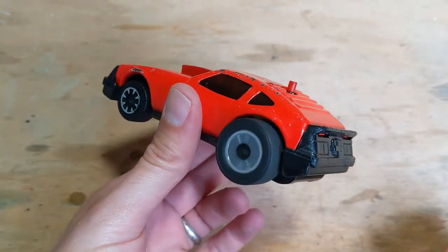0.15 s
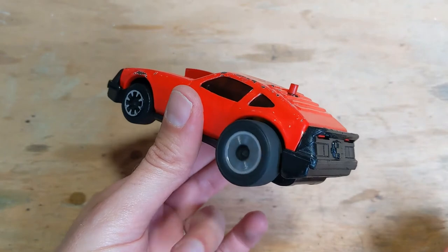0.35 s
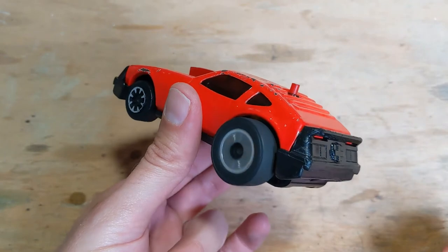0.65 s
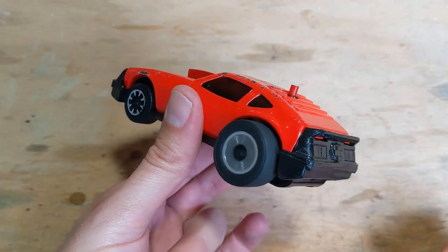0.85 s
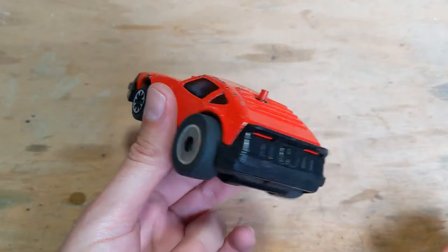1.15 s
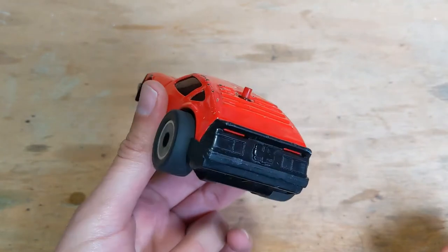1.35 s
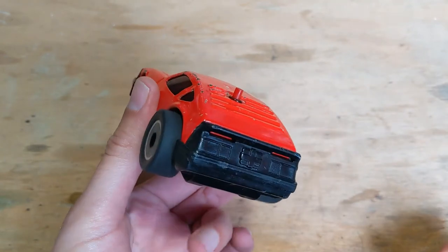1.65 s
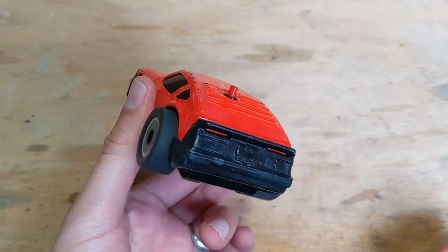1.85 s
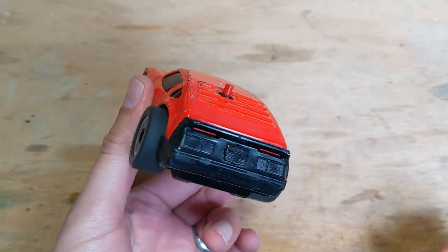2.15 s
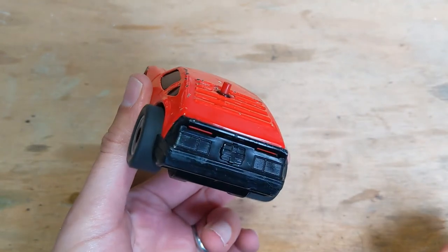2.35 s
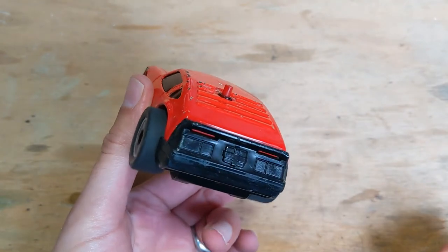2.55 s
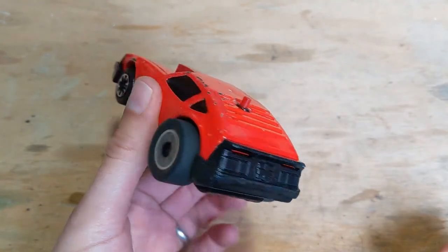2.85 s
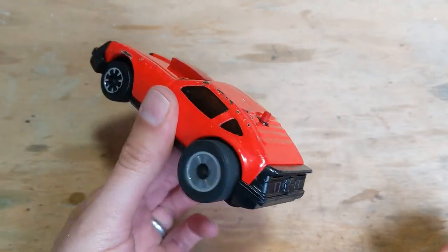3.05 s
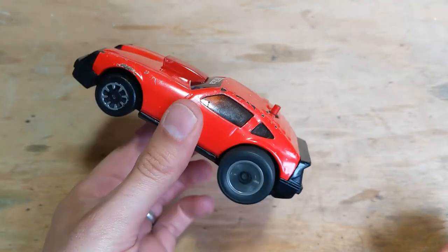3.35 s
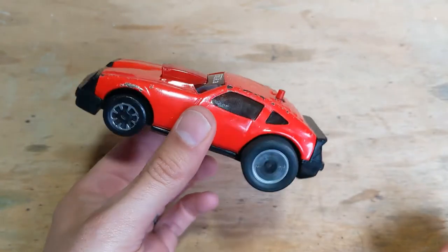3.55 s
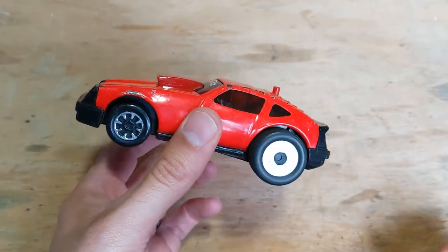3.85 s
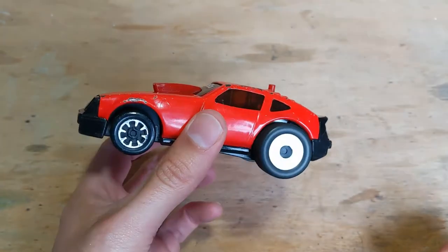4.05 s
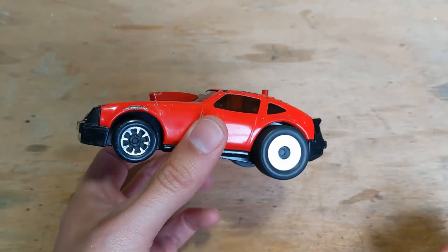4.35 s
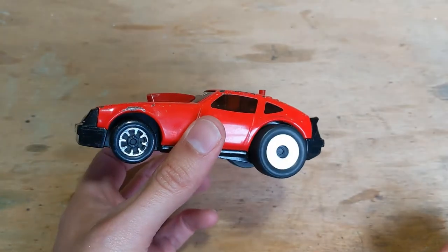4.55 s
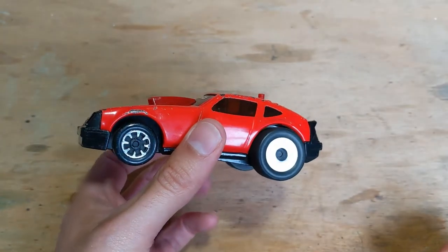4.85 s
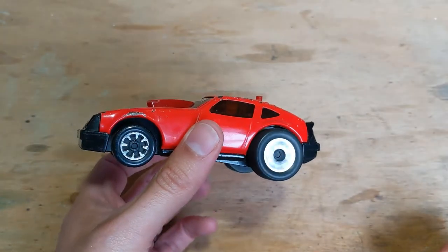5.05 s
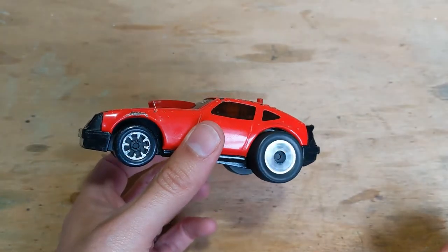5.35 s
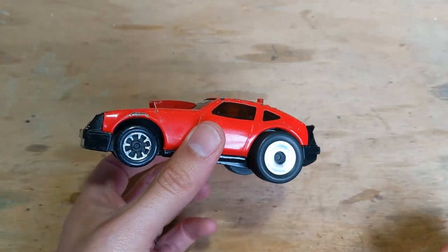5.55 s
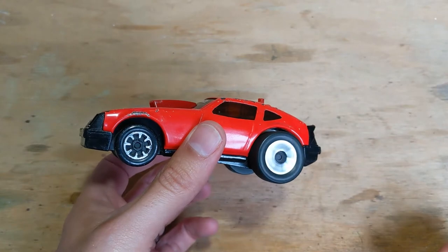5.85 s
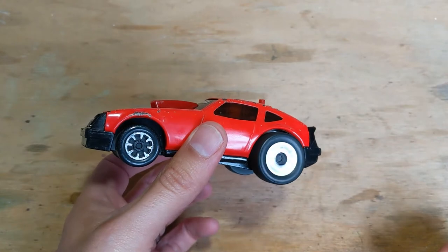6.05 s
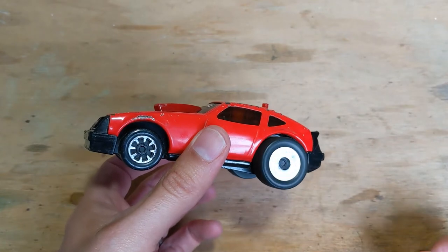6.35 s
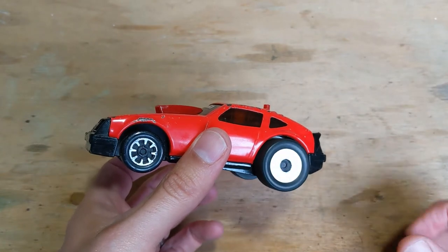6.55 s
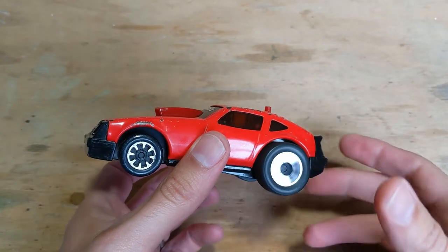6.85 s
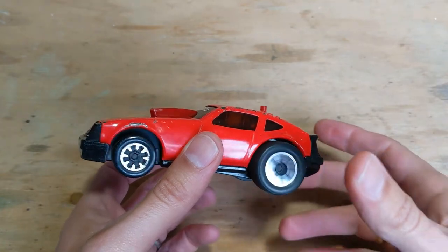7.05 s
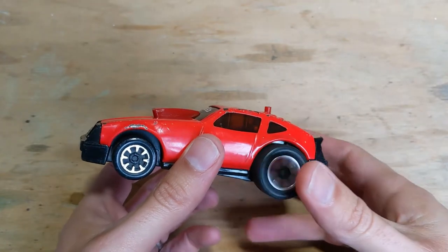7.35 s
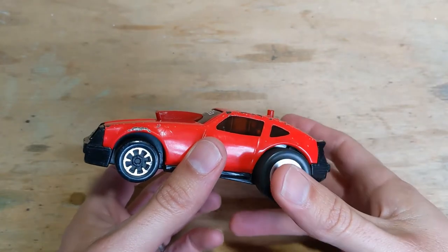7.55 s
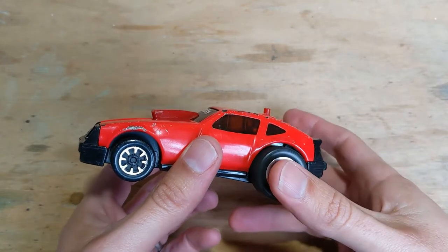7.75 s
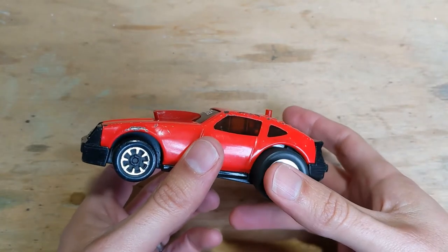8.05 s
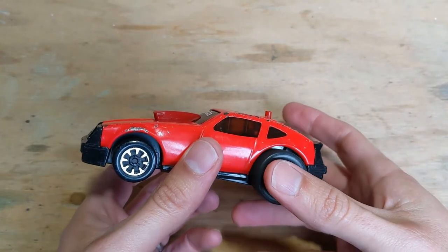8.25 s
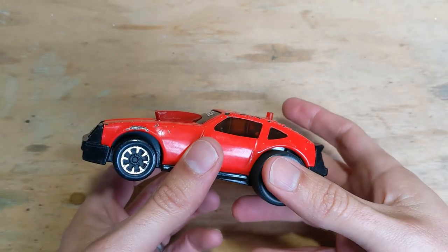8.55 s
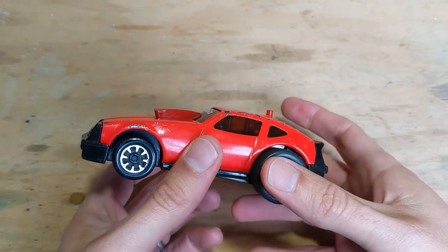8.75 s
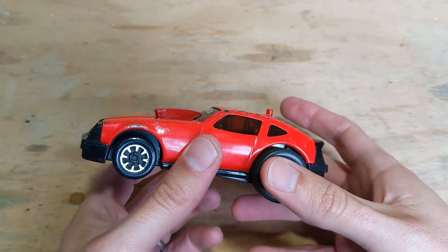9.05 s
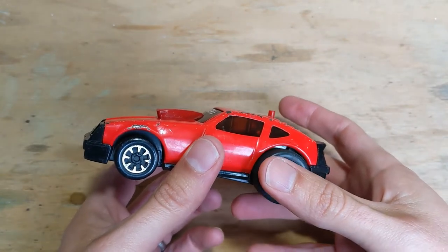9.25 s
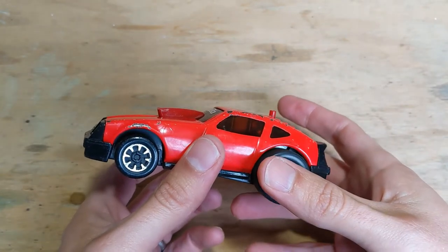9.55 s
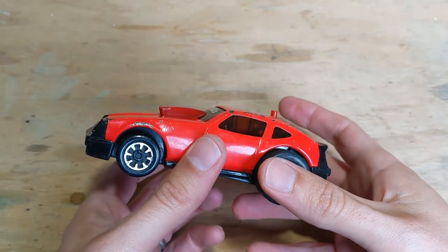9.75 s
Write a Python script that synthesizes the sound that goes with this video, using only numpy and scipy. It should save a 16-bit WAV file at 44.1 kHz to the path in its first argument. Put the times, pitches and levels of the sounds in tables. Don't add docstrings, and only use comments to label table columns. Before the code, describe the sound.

Continuous mechanical whir from a friction-motor toy, very near, in a quiet room with a short reflection off a nearby surface. A buzzy, slightly beating whine with overtones rides on dense plastic rattle, gradually falling and softening for about eight seconds, its colour shifting as the hand turns the car. Then braking makes the fall steeper, leaving slow granular gear chatter almost stopped at the end, over a faint low room hum.

```python
import sys
import numpy as np
from scipy import signal
from scipy.fft import rfft, irfft, next_fast_len
from scipy.io import wavfile
from scipy.ndimage import uniform_filter1d

SR = 44100
rng = np.random.default_rng(int(sys.argv[2]) if len(sys.argv) > 2 else 0)


def generate_wav(sig):
    pcm = np.round(np.clip(np.atleast_2d(sig).T, -1, 1) * 32767).astype(np.int16)
    wavfile.write(sys.argv[1], SR, pcm)


def voltage_ratio(decibels):
    exponent = np.asarray(decibels, float) / 20
    return 10 ** exponent


N = 436149

TEETH = 27
CRUISE = 70
# (t/s, level/dB)
LOAD = [(0, 0), (.5, -2.5), (1, -1.5), (1.3, -2), (1.5, 1.5), (1.75, -1.6), (2.2, -1.5), (2.8, 0.6),
        (3.4, 1.3), (4, 1.6), (4.6, -1.2), (5.4, 1.3), (6.2, 2.5), (6.8, 1), (7.5, 0.5), (8.3, 3.9),
        (9.15, 7), (9.89, 5)]
# (t/s, half length/s, flutter depth 0-1, extra rattle level/dB)
JOLTS = [
    (1.46, 0.11, 0.94, 2.5),
    (2.7, .1, 0.4, -3),
    (5.05, 0.072, 0, 3),
    (8.3, 0.13, 0.27, .5),
]
# (t/s, half length/s, rumble level/dB, hum level/dB)
SWELLS = [(2.05, 0.23, 5, -2.5), (4.2, 0.67, 5.5, -4.5), (5.6, 0.67, 8, -3.5), (6.7, 0.9, 1, -3),
          (8.3, .4, 2, -1.5), (9.75, 0.072, 9, 6)]


def unit(x):
    return x / np.sqrt(np.mean(x ** 2) + 1e-20)


def along(points, hz):
    f, v = np.transpose(points)
    return np.interp(np.log(hz + 1), np.log(f + 1), v)


def curves(rows):
    s, *cols = np.transpose(rows)
    return [np.interp(np.arange(N) / SR, s, c) for c in cols]


def bumps(rows, column=2):
    t = np.arange(N) / SR
    return sum(row[column] * np.exp(-((t - row[0]) / row[1]) ** 2) for row in rows)


def wobble(rate):
    knots = rng.standard_normal(2000)
    return np.interp(np.arange(N) * rate / SR, np.arange(len(knots)), knots)


def filtered(x, response):
    m = next_fast_len(N + SR // 2)
    return irfft(rfft(x, m) * response(np.fft.rfftfreq(m, 1 / SR)), m)[..., :N]


def room_tone():
    # (f/Hz, level/dB per Hz)
    tone_colour = [(12, -30), (20, 0), (32, -1), (70, -7), (92, -18), (119, -20), (166, -30), (216, -19),
                   (244, -25), (275, -21), (383, -27), (480, -26), (620, -56), (1060, -120)]
    # (f/Hz, likeness 0-1)
    alike = [(30, 0.89), (70, 1), (150, 0.16), (400, 0.057)]
    rumble_db, hum_db, drift_db = -60, -60.5, 1

    def colour(hz):
        turn = np.arccos(np.clip(along(alike, hz), -1, 1)) / 2
        return voltage_ratio(along(tone_colour, hz)) * np.array([np.cos(turn), np.sin(turn)])

    out = 0
    for base_db, column, side in [(rumble_db, 2, -1), (hum_db, 3, 1)]:
        level_db = base_db + bumps(SWELLS, column=column) + drift_db * wobble(5)
        noise = rng.standard_normal((2, N))
        mid, diff = filtered(noise, lambda hz: colour(hz) / (1 + (48 / (hz + 1)) ** (6 * side)))
        out = out + voltage_ratio(level_db) * unit(np.array([mid + diff, mid - diff]))
    return out


def hums():
    # (f/Hz, level/dB)
    machines = [
        (26, -65),
        (64, -68.5),
    ]
    t = np.arange(N) / SR
    out = 0
    for (hz, db), column in zip(machines, (2, 3)):
        level_db = db + 2 + bumps(SWELLS, column=column) + 6.4 * wobble(5.6)
        out = out + voltage_ratio(level_db) * np.sin(2 * np.pi * hz * t + 1.53 * wobble(7.5))
    return out


def room(x):
    # (f/Hz, t60/s)
    walls = [(300, .3), (2000, .25), (12000, .2)]
    out, hop = np.zeros((2, N + 4 * SR)), SR // 2
    x, fade = np.pad(x, (hop, 2 * hop)), np.sqrt(np.hanning(2 * hop))
    for start in range(0, N + hop, hop):
        hz, t, z = signal.stft(rng.standard_normal((2, SR // 4)), SR, nperseg=256)
        decay = voltage_ratio(-60 * t / along(walls, hz)[:, None])
        tail = signal.istft(z * decay, SR, nperseg=256)[1]
        chunk = x[start:start + 2 * hop] * fade
        piece = signal.fftconvolve(chunk[None], tail / np.linalg.norm(tail[0]), axes=1)
        out[:, start:start + piece.shape[1]] += piece
    return out[:, hop - 200:][:, :N]


def shell(hz, pose):
    # (f/Hz, level/dB per Hz)
    body_colour = [(180, -37), (300, -12), (601, -23.5), (925, -3.5), (1040, -9.5), (1270, 1), (1420, 2),
                   (1680, -1), (2630, 1), (3200, 7), (4770, 0.5), (5620, -2), (8230, -6), (9870, -9.5),
                   (15700, -12.5)]
    # (f/Hz, width/Hz, lift with tail to the camera/dB, lift side on/dB)
    modes = [(519.6, 31, 13, 10.5), (597, 33, 9.5, 8), (830, 250, 7, 11.5), (871, 37, -26, -11.5),
             (950, 115, -3, 11.5), (1050, 89, 13.5, -28), (1227, 240, 10.5, -5), (1643, 27, 8.5, 14),
             (2064, 153, 5.5, 8.5), (2278, 97, 3.5, 10), (2590, 36, 3.5, -2), (2970, 85, 4, 5.5),
             (3216, 43, -20, 13), (4132, 94, 2, 8), (5643, 660, 6.5, 10.5), (7310, 710, 2.5, 5.5),
             (8300, 150, -9, -3.5), (9850, 1000, 9.5, 6), (12000, 1300, 8.5, 5), (14560, 1240, 12, 9)]
    lift_db = sum(lift[pose] / (1 + (2 * (hz - c) / w) ** 2) for c, w, *lift in modes)
    bounce = 1 + 0.049 * np.exp(-hz / 5000) * np.exp(-2j * np.pi * hz / 206)
    return voltage_ratio(along(body_colour, hz) + lift_db) * bounce


def part_levels(speed):
    # (level/dB, dB per dB of speed, dB per dB of load, tail-on change/dB, held-near change/dB)
    parts = [
        (-37, 0.68, .2, 1, 3),
        (-31, 0.89, 0.37, -2.5, 0.5),
        (-30.5, 1.43, 0.32, -5.5, 0),
    ]
    # (t/s, tail-on share 0-1, held-near share 0-1)
    hand = [(0, 0.32, 0.56), (1.55, 0.089, 0.85), (1.85, 0.43, 0.95), (2.75, 0.56, 1), (3.1, 0.69, 0.85),
            (4.2, 0, 1), (4.6, 0, .01)]
    load_db = curves(LOAD)[0] + bumps(JOLTS, column=3)
    tail, near = curves(hand)
    levels = []
    for db, grows, pushed, tail_db, near_db in parts:
        speed_db = grows * 20 * np.log10(speed / CRUISE)
        levels.append(db + speed_db + pushed * load_db + tail_db * tail + near_db * near)
    return levels


def rattle(speed, angle):
    # (shaft order, level over the rattle/dB)
    uneven = [(4, 9.0), (6, 6.0), (9, 9.0), (10, 15.0), (12, 9.0), (13, 14.0), (14, 15.0), (15, 10.0),
              (17, 15.0), (18, 14.0), (19, 7.0), (20, 7.0), (21, 15.0), (22, 7.0), (23, 9.0), (25, 9.0),
              (31, 10.0), (33, 7.0), (35, 7.0), (36, 9.0), (37, 9.0), (39, 7.0), (40, 10.0), (41, 11.0),
              (44, 8.0), (45, 8.0), (48, 11.0), (52, 6.0), (64, 7.0), (68, 7.0),]
    # (f/Hz, level/dB)
    knock_colour = [(600, -14), (900, -7), (1200, 2), (3000, 3), (4500, -3), (8000, -8)]
    # (t/s, share of the way from tail-on to side-on)
    side_on = [
        (0, 0),
        (2.8, 0.034),
        (4, 0.59),
        (9.89, 0.66),
    ]
    low, high = 2000, 6500

    throb_db = 1.0 * np.sin(angle) + .9 * np.sin(.35 * angle)
    throb_db = throb_db + .5 * wobble(18) + .35 * wobble(45)
    comb = 0
    for order, db in uneven:
        phase = rng.uniform(0, 2 * np.pi)
        comb = comb + voltage_ratio(db + 2.5 * wobble(4)) * np.sin(order * angle + phase)
    comb = filtered(voltage_ratio(-6) * np.sqrt(speed / SR) * comb, lambda hz: voltage_ratio(along(knock_colour, hz)))
    drive = np.vstack([voltage_ratio(throb_db) * rng.standard_normal((3, N)), comb])

    turned, = curves(side_on)
    body = 0
    for pose, share in enumerate([1 - turned, turned]):
        body = body + share * filtered(drive, lambda hz: shell(hz, pose))

    def above(hz, edge):
        return 1 / (1 + (edge / (hz + 1)) ** 8)

    bands = [filtered(body, lambda hz: 1 - above(hz, low)),
             filtered(body, lambda hz: above(hz, low) - above(hz, high)),
             filtered(body, lambda hz: above(hz, high))]
    out = 0
    for db, band in zip(part_levels(speed), bands):
        out = out + voltage_ratio(db - 9.0 + 0.53 * wobble(8.2)) * band / band[0].std()
    return out


def pinion(angle):
    level_db, = curves([(0, -75), (2.9, -95), (3.6, -63), (4.6, -67), (5.4, -76), (6.5, -103)])
    return voltage_ratio(level_db) * np.sin(TEETH / 7 * angle)


def shaft():
    # (t/s, shaft turns a second)
    coast = [(0.0, 133.94), (0.62, 124.65), (1.38, 114.51), (1.5, 111.07), (1.62, 109.09), (2.12, 103.48),
             (2.75, 97.54), (3.12, 93.56), (4.5, 77.5), (5.25, 68.5), (6.0, 60.29), (6.75, 52.65),
             (7.5, 45.75), (8.12, 40.22), (8.38, 37.46), (8.88, 29.75), (9.25, 23.03), (9.89, 9.26)]
    smooth = uniform_filter1d(curves(coast)[0], SR // 10, mode="nearest")
    speed = smooth * (1 + .0008 * wobble(25))
    return speed, 2 * np.pi * np.cumsum(speed) / SR


def mesh_levels(speed):
    # (level/dB, dB gained per dB of speed)
    overtones = [(-41, 0.9), (-40.5, 2.1), (-39, 2.5), (-43, 2.2), (-48, 1.4), (-49, 1.7)]
    # (f/Hz, width/Hz, level/dB)
    frame = [(814, 120, -13.5), (1150, 58.0, -66), (1259, 236, 9), (1503, 40, 6.5), (1618, 269.0, 6),
             (1880, 59, 10), (2058.0, 180, 10), (2290, 170, 8), (2450, 41, 4), (2576, 160, 1.5),
             (3190, 250, -26), (3024, 590, 6), (3456, 120, 3.8), (3800, 590, 2)]
    # (f/Hz, width/Hz, level/dB)
    axle = [(4100, 690, -3), (5530, 820, -5), (6160, 820, -10), (7080, 540, -11.5), (9830, 730, -7.5),
            (11700, 910, -8), (13400, 900, -13), (15200, 700, -11)]
    slow = speed[::64]
    levels = []
    for k, (db, grows) in enumerate(overtones, start=1):
        mesh_hz = k * TEETH * slow
        power = sum(voltage_ratio(2 * g) / (1 + (2 * (mesh_hz - c) / w) ** 2) ** 2 for c, w, g in frame + axle)
        power = power / (1 + (715 / mesh_hz) ** 8)
        level_db = db + 10 * np.log10(power) + grows * 20 * np.log10(slow / CRUISE)
        levels.append(np.repeat(level_db, 64)[:N] + curves(LOAD)[0])
    return levels


def whine(speed, angle):
    # (shaft order offset, level/dB)
    runout = [(-2, -20), (-1, -13), (-.35, -25), (0, 0), (.35, -26), (1, -8.5), (2, -18)]
    loose, = curves([(0, 1.4), (1.8, 1.4), (2.6, 1), (8.3, 1), (9.3, 1.8)])
    idler, idler_lag = 0.39, 2
    out = np.zeros(N)
    for k, level_db in enumerate(mesh_levels(speed), start=1):
        play = loose * (.05 * k + .065 * k * k) * np.maximum(speed / CRUISE, 1) ** 1.1
        slip = play * (wobble(90) + .12 * k * wobble(200)) + rng.uniform(0, 2 * np.pi)
        tones = 0
        for d, db in runout:
            unsteady_db = (.8 + 2.2 * (d != 0)) * wobble(5)
            phase = (k * TEETH + d) * angle + slip + .5 * d * d + 2.2 * k * d
            tones = tones + voltage_ratio(db + unsteady_db) * np.sin(phase)
        flicker_db = .6 * k * wobble(35) + .3 * k * wobble(6)
        out += voltage_ratio(level_db - 1) * unit(tones * voltage_ratio(flicker_db))
    flutter = np.clip(bumps(JOLTS), 0, 1) * np.sin(idler * angle - idler_lag)
    return out * (1 + flutter)


def scene():
    # (f/Hz, level/dB)
    direct = [(400, -4), (1200, -1), (2500, -4), (4500, -6), (12000, -6)]
    # (f/Hz, level/dB)
    diffuse = [(400, -2), (1200, -5), (2500, -2), (4500, -1), (12000, 0)]
    # (f/Hz, level/dB)
    sides = [(300, 2.5), (700, 4.5), (1300, 3.5), (2400, -0.5), (4400, 1.5), (8000, 1), (15000, 4.5)]
    # (f/Hz, phase/rad)
    lead = [(300, .1), (700, .3), (1400, .8), (2100, 1.1), (4100, 1.6), (15000, 1.7)]
    # (t/s, half length/s, level/dB)
    skips = [(1.429, 0.003, -3), (2.465, 0.0095, -7), (2.604, 0.0096, -8.5), (3.841, .008, -6),
             (5.785, 0.0074, -5), (6.905, 0.0068, -4), (8.127, 0.0074, -4.5), (9.85, .008, -7)]
    speed, angle = shaft()
    straight, left, right, comb = rattle(speed, angle)
    tones = voltage_ratio(1.0) * (whine(speed, angle) + pinion(angle)) + comb
    near = filtered(straight, lambda hz: voltage_ratio(along(direct, hz))) + tones
    scattered = filtered(np.array([left, right]), lambda hz: voltage_ratio(along(diffuse, hz)))
    far = scattered + voltage_ratio(-6) * room(tones)

    def ports(hz):
        ratio = voltage_ratio(along(sides, hz)) * np.exp(1j * along(lead, hz))
        return ratio ** np.array([[.5], [-.5]])

    car = filtered(voltage_ratio(bumps(skips)) * (near + far), ports)
    return car + room_tone() + hums()


def top_cut(x):
    return signal.sosfilt(signal.butter(12, 16480, fs=SR, output="sos"), x)


def record(dry):
    mix = filtered(dry, lambda hz: hz < 15730)
    return top_cut(mix)


dry = scene()
out = record(dry)
generate_wav(out)
```